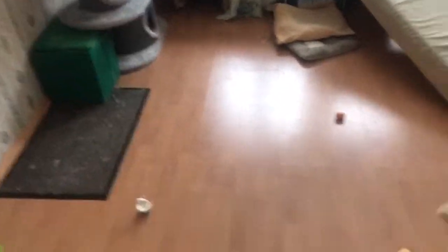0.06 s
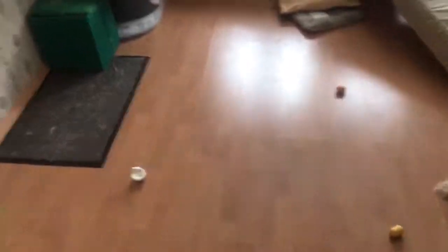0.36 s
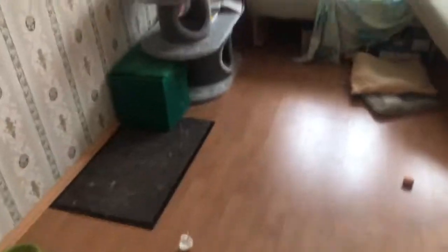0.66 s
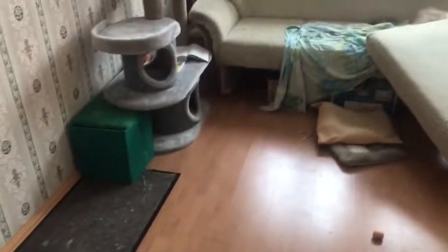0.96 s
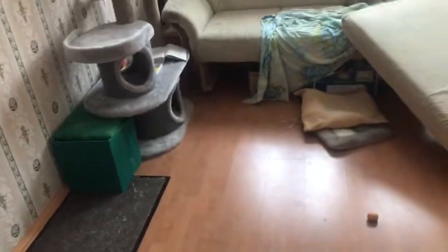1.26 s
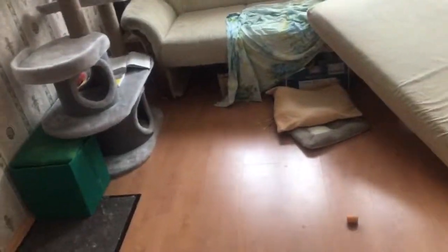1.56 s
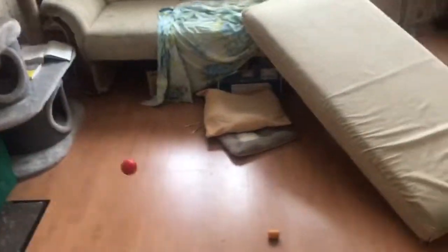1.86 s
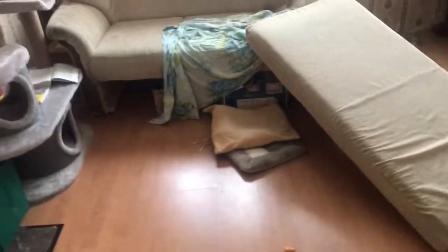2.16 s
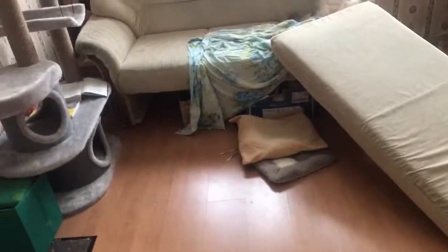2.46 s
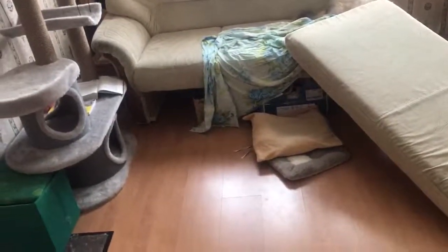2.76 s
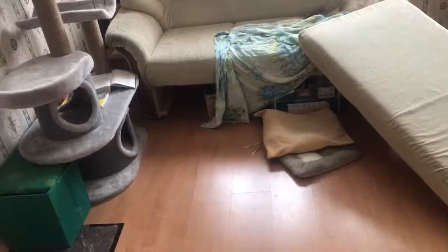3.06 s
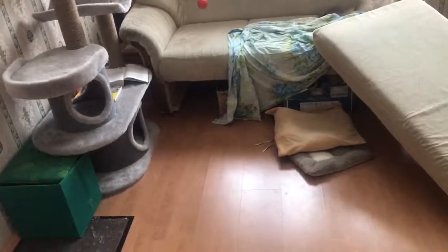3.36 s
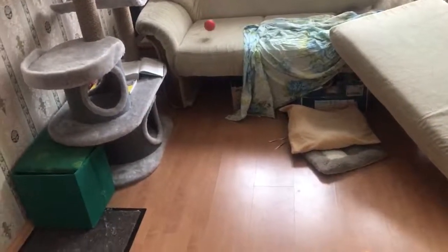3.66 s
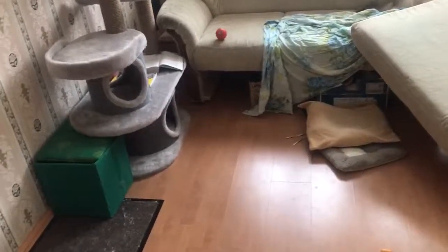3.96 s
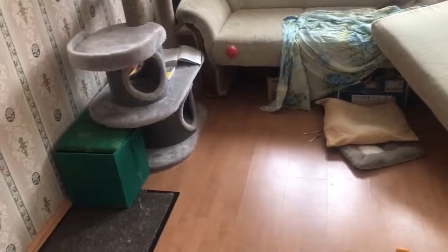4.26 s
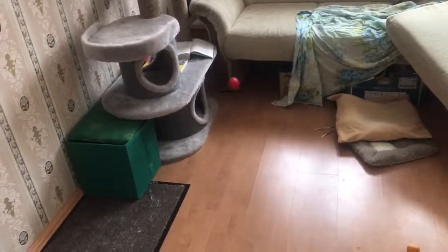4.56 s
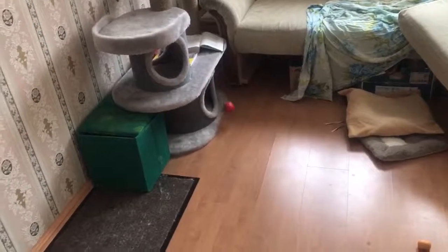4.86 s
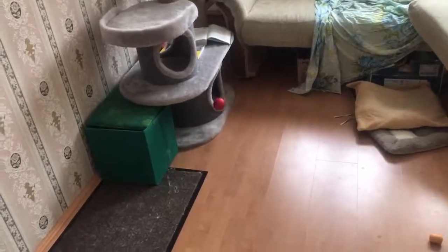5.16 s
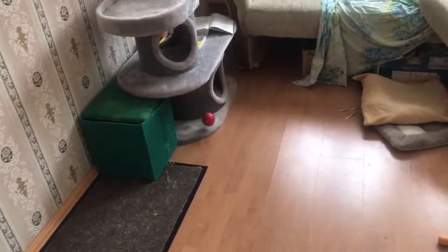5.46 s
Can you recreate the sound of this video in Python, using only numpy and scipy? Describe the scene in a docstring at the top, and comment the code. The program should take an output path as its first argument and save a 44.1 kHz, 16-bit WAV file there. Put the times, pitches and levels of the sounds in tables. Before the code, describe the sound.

A small rubber ball hits a laminate floor with a sharp woody crack and a low thump. After a few light handling clicks and a tiny plastic chink, it cracks down again, knocks dully against a wall and a sofa, drops back for two floor bounces and patters to rest on a cat tree. The microphone is in a quiet living room with short echo and faint hiss.

```python
"""Rubber ball in a living room

A small ball cracks twice on a laminate floor, knocks dully on wall and sofa, drops back and hops to
rest on a cat tree. Each blow layers a woody knock, a contact tick and a low thump; every surface has
its own voice, and harder blows are brighter. Small handling clicks and a plastic chink sit over a
quiet bed of hiss, rustling clothes and faint electrical ticking."""
import sys
import numpy as np
from scipy import signal
from scipy.fft import rfft, irfft
from scipy.io import wavfile

SR = 44100
rng = np.random.default_rng(int(sys.argv[2]) if len(sys.argv) > 2 else 0)


def inscribe(sig):
    """Save sig as 16-bit PCM at rate SR to the path in sys.argv[1].

    A 1-D sig is mono; a 2-D sig holds one channel per row.
    Samples are clipped to [-1, 1] before scaling.
    """
    pcm = np.round(np.clip(np.atleast_2d(sig).T, -1, 1) * 32767)
    wavfile.write(sys.argv[1], SR, pcm.astype(np.int16))


N = 243326
RING_N = SR   # each hit gets one second to ring
T, SCENE_T = np.arange(RING_N) / SR, np.arange(N) / SR
TAP = signal.unit_impulse(RING_N)


def from_db(db):
    """Decibels to gain."""
    return 10 ** (np.asarray(db) / 20)


def at_hz(points, hz):
    """Read a curve on a log-frequency axis."""
    f, value = np.transpose(points)
    return np.interp(np.log(np.maximum(hz, 1)), np.log(f), value)


def filtered(x, hz, kind, order=2):
    """Butterworth filter."""
    edges = np.clip(hz, 10, .45 * SR)
    return signal.sosfilt(signal.butter(order, edges, kind, fs=SR, output="sos"), x + 1e-18)


def equalised(x, bells):
    """A chain of bell-shaped peaks and dips."""
    for hz, width_hz, db in bells:
        gain, half_width = from_db(db / 2), np.pi * width_hz / SR
        tuning = -2 * np.cos(2 * np.pi * hz / SR)
        b = [1 + half_width * gain, tuning, 1 - half_width * gain]
        a = [1 + half_width / gain, tuning, 1 - half_width / gain]
        x = signal.lfilter(b, a, x + 1e-18)
    return x


def add(out, s, sound):
    """Mix a sound in at its cue."""
    start = round(s * SR)
    out[start:start + len(sound)] += sound[:N - start]


def ringing(modes):
    """Damped modes after a tap; level is the gain at resonance, and neighbours alternate in polarity."""
    out = np.zeros(RING_N)
    for k, (hz, db, t60) in enumerate(modes):
        damping = np.log(1000) / t60
        amplitude = (-1) ** k * from_db(db) * 2 * damping / SR
        out += amplitude * np.exp(-damping * T) * np.sin(2 * np.pi * hz * T)
    return out


def noise(spectrum):
    """Steady noise of a given colour, rms 1."""
    colour = from_db(at_hz(spectrum, np.arange(N // 2 + 1) * SR / N))
    x = irfft(rfft(rng.standard_normal(N)) * colour, N)
    return x / np.std(x)


def crackle(fade_s):
    """A very short burst of noise, unit energy."""
    burst = rng.standard_normal(RING_N) * np.exp(-T / fade_s)
    return burst / np.linalg.norm(burst)


# colour of the noise bed: f/Hz, relative level/dB
ROOM_TONE_SPECTRUM = [(15, 4), (25, -0.5), (53, 2.5), (114, -11), (185, -6.5), (326, -15), (384, -14),
                      (416, -18), (545, -18.5), (714, -20), (911, -23), (10400, -35), (14000, -29.5),
                      (16000, -45)]

def room_tone(level_db=-66, brush_s=0.067, brush_width_s=0.01, brush_db=-68.5):
    """Steady rumble and hiss, swelling once as a sleeve brushes past."""
    brush = from_db(brush_db) * np.exp(-((SCENE_T - brush_s) / brush_width_s) ** 2)
    return (from_db(level_db) + brush) * noise(ROOM_TONE_SPECTRUM)


# colour of moving cloth: f/Hz, relative level/dB
CLOTH_SPECTRUM = [(40, -1.5), (120, -8), (400, -13.5), (1500, -20.5), (5000, -27.5), (15000, -30)]

def rustle(peak_db=-71, still_s=2, grow_db_per_s=3, settle_db_per_s=43, waver_db=2, waver_s=0.07):
    """Clothes rustle unevenly, building until the thrower stands still, then dying away."""
    cloth = noise(CLOTH_SPECTRUM)
    fade_db = np.maximum(grow_db_per_s * (still_s - SCENE_T), settle_db_per_s * (SCENE_T - still_s))
    waver = np.interp(SCENE_T / waver_s, np.arange(N), rng.standard_normal(N))
    return from_db(peak_db - fade_db + waver_db * waver) * cloth


# thin ring of an electrical tick: f/Hz, level/dB, t60/s
ELECTRICAL_MODES = [(6240, -2.5, 0.0035), (11170, 4, 0.0048), (12400, -2, 0.0013), (13500, -9, 0.0047),
                    (14600, 2.5, 0.0016), (15450, 5, .004)]

def interference(period_s=0.1024, burst_s=0.0011, on_db=-50, off_db=-47, spread_db=3.5):
    """Radio bursts leak into the electronics: a faint tick as each switches on and off."""
    starts = np.arange(.0307, N / SR - .01, period_s)
    strength = from_db(rng.normal(0, spread_db, len(starts)))
    edges = np.zeros(N)
    edges[np.round(starts * SR).astype(int)] = from_db(on_db) * strength
    edges[np.round((starts + burst_s) * SR).astype(int)] -= from_db(off_db) * strength
    return signal.fftconvolve(edges, ringing(ELECTRICAL_MODES))[:N]


# reverb time of the living room: f/Hz, t60/s
ROOM_DECAY = [(60, 1), (150, 0.4), (350, 0.3), (800, 0.27), (2000, 0.28), (4500, 0.24), (9000, 0.21),
              (15000, 0.17)]

def reflections(build_s=0.00095, first_per_s=900, thicken_s=.012):
    """Room echoes from one spot: sparse at first, then dense, the treble dying soonest."""
    density = np.clip(first_per_s * (1 + (T / thicken_s) ** 2) / SR, 0, 1)
    echoes = rng.choice([-1, 1], RING_N) * (rng.random(RING_N) < density) / np.sqrt(density)
    spectrum = rfft(echoes)
    hz = np.maximum(np.arange(len(spectrum)) * SR / RING_N, 1)
    centres = np.geomspace(50, 16000, 14)
    build_up = 1 - np.exp(-(T / build_s) ** 2)
    out = np.zeros(RING_N)
    for centre, pick in zip(centres, np.eye(len(centres))):
        weight = np.interp(np.log(hz), np.log(centres), pick)
        decay = np.exp(-np.log(1000) * T / at_hz(ROOM_DECAY, centre))
        band = irfft(spectrum * weight, RING_N) * build_up * decay
        out += band * np.sqrt(np.mean(weight ** 2) / np.sum(band ** 2))   # a tap's energy in this band
    return out


# ball and boards ringing together: f/Hz, level/dB, t60/s
BOARD_MODES = [(276, 3, 0.86), (319, 2.5, 0.26), (426, -11, 0.4), (453, 4, 0.41), (596, 7, 0.31),
               (684, 5.5, 0.058), (710.6, 9, 0.099), (757, -3, 0.13), (990, 2.5, 0.095), (1013, 9.5, 0.26),
               (1106, 12, 0.29), (1374, 11.5, 0.13), (1715, 12, 0.23), (2082, 10.5, 0.17), (2105, 0, 0.36),
               (2380, -3, 0.37), (2570, -11, 0.42), (2710, -18, 0.17), (3650, 11, 0.24), (4140, 1, 0.02),
               (4300, -2, 0.12)]
# woody tone of the floor: f/Hz, width/Hz, gain/dB
BOARD_EQ = [(382, 53, -1), (440, 84, 1), (505, 26, -13), (680, 15, -2.5), (930, 110, -2), (970, 67, 3.5),
            (1565, 1160, -4.5), (2750, 380, 1.5), (4180, 510, 4.5), (7500, 2200, -19)]

def knock(direct, ring_db, low_hz, contact_hz, hollow_hz, board_hz=520, room_db=2, hollow_db=6):
    """The woody body of a blow, with a peak at the hollow note of the struck surface."""
    body = direct * TAP + from_db(ring_db) * ringing(BOARD_MODES) + from_db(room_db) * reflections()
    body = filtered(body, board_hz, "low", order=1)   # the mass of the boards tilts the treble down
    body = filtered(body, contact_hz, "low")   # a longer, softer contact takes off the top
    body = equalised(filtered(body, low_hz, "high"), BOARD_EQ)
    return equalised(body, [(hollow_hz, 0.18 * hollow_hz, hollow_db)])


# bite of the contact tick: f/Hz, width/Hz, gain/dB
TICK_EQ = [(1770, 1000, 12.5), (3430, 1560, 6.5), (5840, 3600, 4), (7700, 820, -4), (10500, 400, -7)]

def tick(direct, room, grip_s=0.00058, room_db=-2, low_hz=3000, top_hz=9000):
    """The bright edge of a blow: the surfaces grip and crackle for an instant."""
    grip = equalised(direct * crackle(grip_s) + from_db(room_db) * room, TICK_EQ)
    return filtered(filtered(grip, low_hz, "high", order=1), top_hz, "low", order=1)


# low boom of panels and room: f/Hz, level/dB, t60/s
PANEL_MODES = [(44.32, 9, 11), (49.5, 18, 0.77), (60, -3, 4), (67.1, 7.5, 0.85), (80.1, 10, 0.4),
               (101.3, 6, 0.68), (122.5, 2.5, 0.29), (146.55, 8, 0.41), (162.1, 7.5, 0.31),
               (182.4, 1, 0.41), (226.2, 6, 0.39), (287, 8, 0.32)]

def thump(direct, room, band_hz, tap_db=-1, boom_db=-1, room_db=-5):
    """The weight of a blow: panel size sets the band of low modes that swell just after the knock."""
    boom = from_db(boom_db) * ringing(PANEL_MODES)
    swing = direct * from_db(tap_db) * TAP + boom + from_db(room_db) * room
    return filtered(swing, sorted(band_hz), "band", order=4)


# voice of each surface, its tops given for a 0 dB knock: knock top/Hz, knock bottom/Hz,
# hollow note/Hz, board ring/dB, thump bottom/Hz, thump top/Hz, direct level/dB
SURFACE_VOICES = { "near floor": (2600, 155, 272, 2.1, 78, 184, 5.2),
                  "middle floor": (2696, 220, 687, 0, 63, 218, -1.5),
                  "far floor": (2550, 470, 729, -2.5, 87, 216.5, -1.5),
                  "wall": (1553, 136, 425, -3.5, 59, 172.5, -6.5),
                  "sofa frame": (1606, 174, 294, 0.5, 99, 296, -7),
                  "sofa seat": (3097, 142, 325, -2.5, 34.5, 153, -2.5),
                  "cat tree": (2900, 234, 324, -13, 105.5, 347, -6.5)}
# cue list of the ball: t/s, surface, knock level/dB, tick level/dB, thump level/dB
BALL_CUES = [ (0.2121, "near floor", 9.5, -20, 17), (1.9920, "middle floor", -4, -18, -4),
             (1.9949, "middle floor", 5, -21, 19), (2.5711, "wall", -6.5, -46, 9.5),
             (2.7400, "wall", -17, -46, 11), (2.7460, "wall", -7.5, -34, 21),
             (3.2681, "sofa frame", -2, -35, 13.5), (3.2918, "sofa seat", -15, -32.5, 15),
             (3.6519, "sofa seat", -12, -57, 7.5), (3.855, "sofa seat", -19.5, -70, -3),
             (4.5478, "far floor", -8.5, -27.5, 16), (5.0030, "far floor", -7, -32, 11),
             (5.137, "cat tree", -10.5, -37, -5), (5.164, "cat tree", -16, -48, -19),
             (5.185, "cat tree", -11, -49, 1.5), (5.351, "cat tree", -24, -67, 2.5)]

def ball(knock_oct_per_db=0.11, thump_oct_per_db=0.0336):
    """The ball strikes each surface in turn; a harder blow is shorter, so knock and thump open up."""
    out = np.zeros(N)
    for s, surface, knock_db, tick_db, thump_db in BALL_CUES:
        contact_hz, low_hz, hollow_hz, ring_db, bottom_hz, top_hz, direct_db = SURFACE_VOICES[surface]
        contact_hz *= 2 ** (knock_oct_per_db * knock_db)
        top_hz *= 2 ** (thump_oct_per_db * knock_db)
        direct, room = from_db(direct_db), reflections()
        add(out, s, from_db(knock_db) * knock(direct, ring_db, low_hz, contact_hz, hollow_hz))
        add(out, s, from_db(tick_db) * tick(direct, room))
        add(out, s, from_db(thump_db) * thump(direct, room, (bottom_hz, top_hz)))
    return out


# body of a handling click: f/Hz, width/Hz, gain/dB
CLICK_EQ = [(850, 530, 4.5), (1400, 180, 4.5), (2150, 180, 1.5), (3960, 620, 1)]
# reverb send by place: level/dB
CLICK_SENDS = {"hand": -12.5, "room": 2.5}
# cue list of the clicks: t/s, place, click level/dB, cut-off/Hz, bump level/dB
CLICK_CUES = [ (0.5988, "hand", -21.5, 1590, 1), (0.613, "hand", -30, 5500, 4),
              (0.626, "hand", -34, 3000, -22), (1.1020, "room", -30, 2150, -38),
              (1.6582, "room", -33, 6460, -10), (1.736, "room", -27, 760, -8.5),
              (1.756, "room", -30, 700, -13)]

def handling_clicks(crackle_s=0.0023, low_cut_hz=300, bump_hz=(55, 120)):
    """Light handling: each click is a brief crackle over a soft bump, almost dry when in the hand."""
    out = np.zeros(N)
    for s, place, click_db, top_hz, bump_db in CLICK_CUES:
        room = from_db(CLICK_SENDS[place]) * reflections()
        click = filtered(crackle(crackle_s) + room, top_hz, "low", order=1)
        click = filtered(equalised(click, CLICK_EQ), low_cut_hz, "high")
        bump = filtered(TAP + room, bump_hz, "band")
        add(out, s, from_db(click_db) * click + from_db(bump_db) * bump)
    return out


# short, bright ring of hard plastic: f/Hz, level/dB, t60/s
CHINK_MODES = [(3700, 1, 0.0082), (4020, 3, 0.012), (4300, 2.5, 0.014), (4600, -2, 0.016)]

def plastic_chink(at_s=1.6583, gain_db=-20):
    """A small plastic piece is tapped once and rings into the room."""
    out = np.zeros(N)
    chink = signal.fftconvolve(ringing(CHINK_MODES), TAP + reflections())[:RING_N]
    add(out, at_s, from_db(gain_db) * chink)
    return out


def scene():
    """The hits over the quiet bed, in mono."""
    hits = ball() + handling_clicks() + plastic_chink()
    bed = room_tone() + rustle() + interference()
    return (hits + bed)[None, :]


def record(dry, bass_cut_hz=30, top_cut_hz=16100):
    """The microphone loses the deepest bass; the top is cut steeply."""
    top_cut = signal.ellip(10, .1, 70, top_cut_hz, fs=SR, output="sos")
    return signal.sosfilt(top_cut, filtered(dry, bass_cut_hz, "high"))


dry = scene()
out = record(dry)
inscribe(out)
```